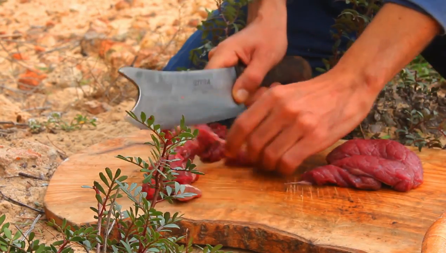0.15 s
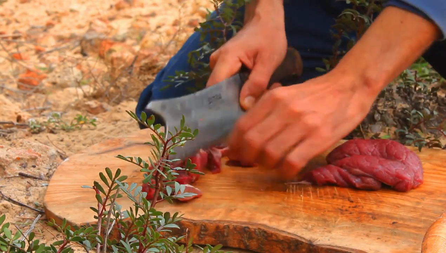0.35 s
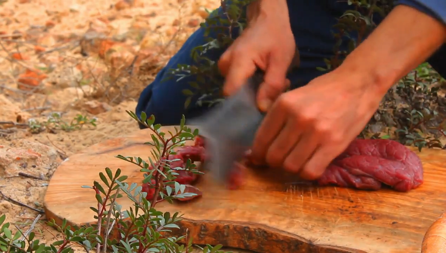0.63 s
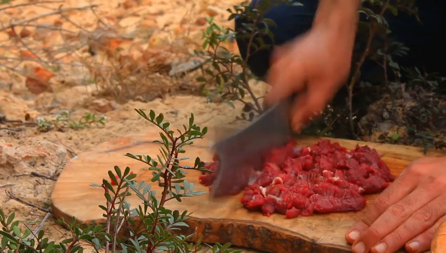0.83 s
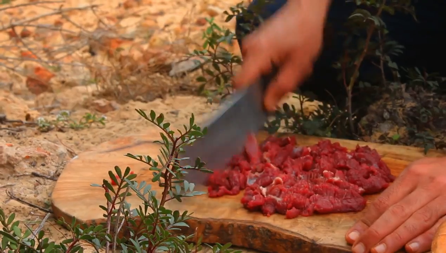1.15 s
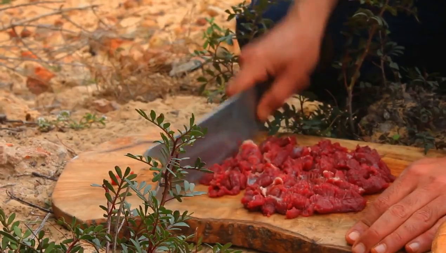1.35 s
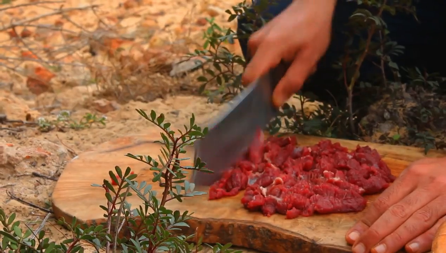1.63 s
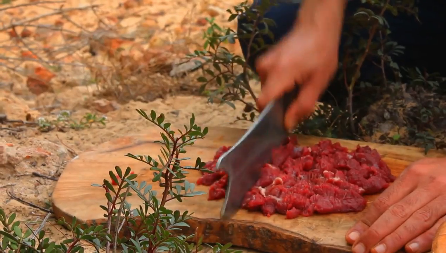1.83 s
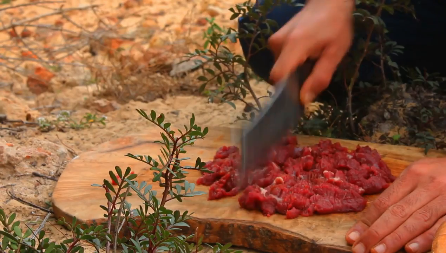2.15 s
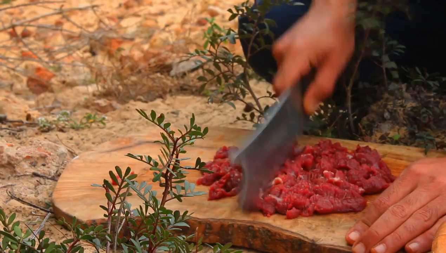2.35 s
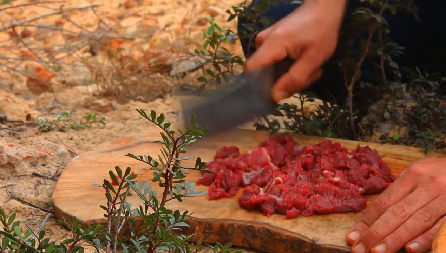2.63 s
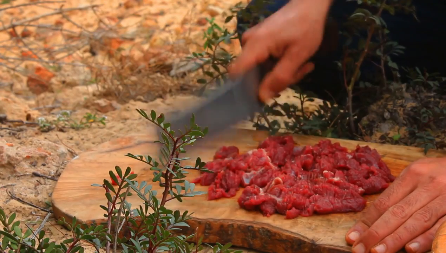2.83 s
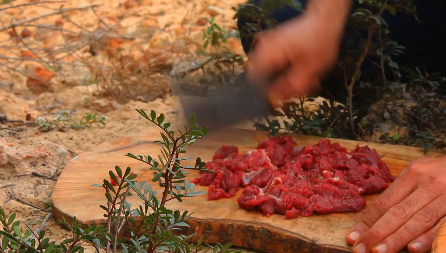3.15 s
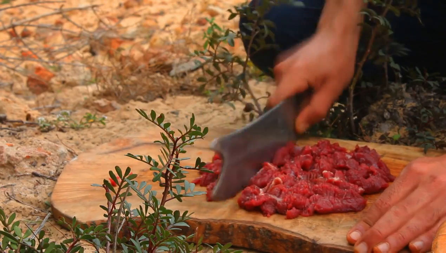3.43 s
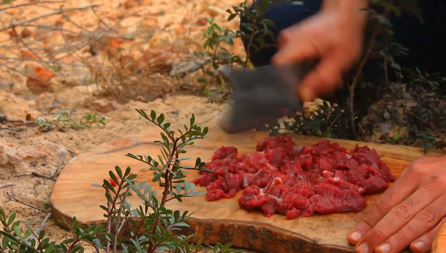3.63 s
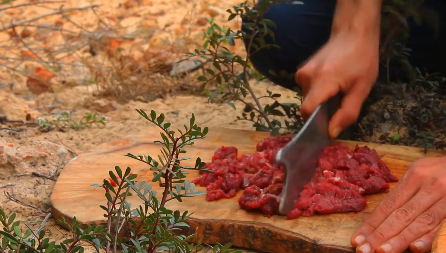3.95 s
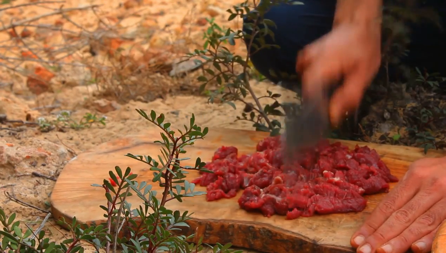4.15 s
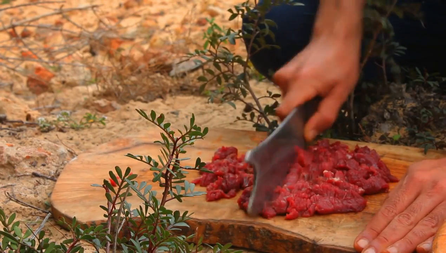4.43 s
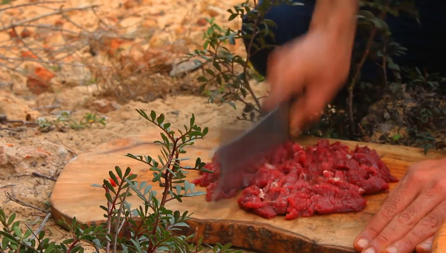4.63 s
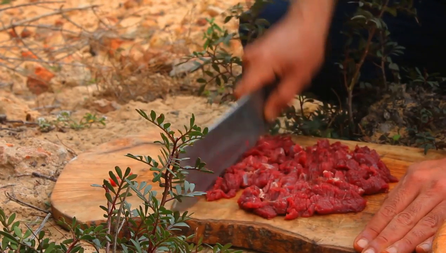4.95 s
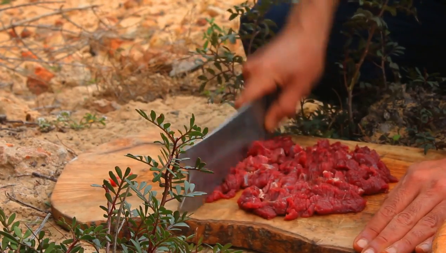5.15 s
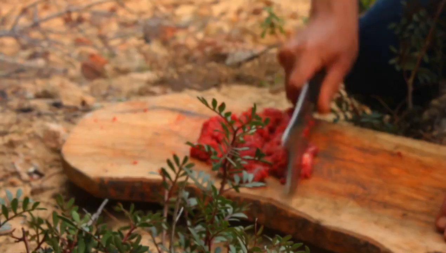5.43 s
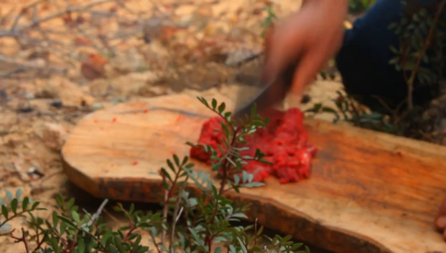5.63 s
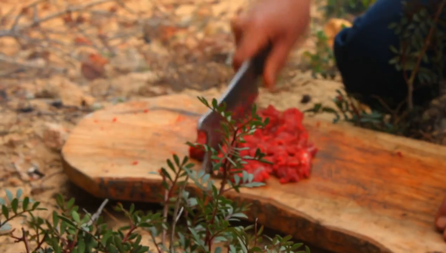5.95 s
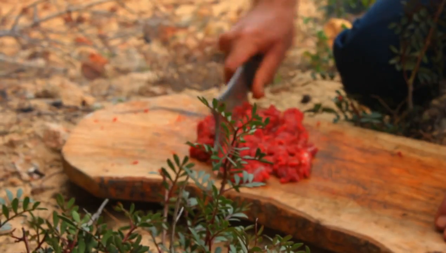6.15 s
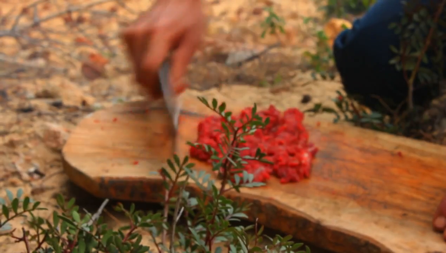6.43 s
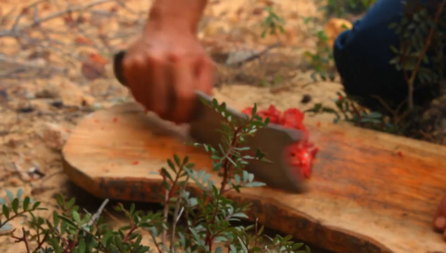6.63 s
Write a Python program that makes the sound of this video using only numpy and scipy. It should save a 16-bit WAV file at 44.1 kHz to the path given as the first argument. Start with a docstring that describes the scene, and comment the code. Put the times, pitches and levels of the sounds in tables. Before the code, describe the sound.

Close up outdoors, a blade first slices sinewy meat with faint gritty rasps and tiny snaps. From about one second a cleaver chops meat on a thick wooden slab, roughly four strokes a second, some sharp and loud with a dull steel clank, others soft and thuddy. Sticky wet crackles fill the gaps. The last strokes sound lower and boomier, then the blade briefly scrapes the wood. Faint wind lies behind.

```python
"""Mincing meat with a cleaver

A cleaver minces raw meat on a thick wooden slab lying on stony ground, heard from close by, in two shots.
Each stroke is a grainy squelch, then decaying slab and blade modes softened by the meat; loud ones duck
the gain and clip. Sinew rasps and sticky meat crackles as filtered grains and snaps, the slab bumps on
the earth, and lastly the blade scrapes the wood. Shaped noise is far wind, gliding tones are birds.
"""
import sys
import numpy as np
from scipy import signal
from scipy.fft import rfft, irfft
from scipy.io import wavfile

SR = 44100
rng = np.random.default_rng(int(sys.argv[2]) if len(sys.argv) > 2 else 0)


def dump(signal):
    """Clip the signal to [-1, 1] and save it as 16-bit WAV at the path in sys.argv[1]."""
    limited = np.clip(np.atleast_2d(signal).T, -1, 1)
    pcm = np.round(limited * 32767).astype(np.int16)
    wavfile.write(sys.argv[1], SR, pcm)


N = 298998
TIME = np.arange(N) / SR
RING = TIME[:8192]  # time axis of one blow, s
CUT_S = 5.45  # cut to a second shot, with the slab resting differently

# Cleaver strokes. Each row: time in seconds, force in dB, contact sharpness in Hz, pitch favoured by the
# struck spot in Hz, relative blade ring in dB, squelch in dB, meat clinging on the lift before it in dB.
CHOPS = [(.983, -11.5, 1290, 1340, -0.5, -20, -44.5), (1.1977, 2.5, 1260, 793, -13.5, -13, -46),
         (1.4168, -3, 3170, 1074, 11, -0.5, -47.5), (1.655, -0.5, 690, 706, 4.5, -20, -51.5),
         (1.9237, -12, 503, 156, 3.5, -31.5, -52), (2.155, -13.5, 454, 450, -23, -26.5, -43),
         (2.388, -4, 1430, 450, 8.5, -16.5, -43.5), (2.62, -11, 440, 390, 2, -26.5, -47.5),
         (2.8464, -1.5, 3120, 910, 9, -2.5, -50.5), (3.0734, 3, 2260, 890, -3, -9.5, -82),
         (3.0815, -7.5, 1340, 1110, 3, -40, -42), (3.3242, -5, 694, 590, 1.5, -21.5, -43.5),
         (3.572, -2.5, 2150, 490, -0.5, -15.5, -51.5), (3.827, -14, 625, 380, 5, -26, -53.5),
         (4.086, -14.5, 546, 427, -11, -29, -45), (4.3212, -11.5, 566, 406, -15, -28.5, -54.5),
         (4.561, -14.5, 496, 166, -21, -24, -46.5), (4.7854, -3, 1820, 627, 4, -10.5, -54.5),
         (5.0168, 1, 3230, 1360, 10, -2.5, -47), (5.252, 0, 3150, 583, 8, 4, -44.5),
         (5.5378, 3.5, 1460, 756, 2, -13, -67), (5.786, -12.5, 312, 187, 5.5, -31, -68),
         (6.025, -14.5, 270, 156, 9.5, -37.5, -66), (6.2778, -6.5, 525, 204, -23, -22.5, -74),
         (6.602, -6.5, 1450, 924, -1, -22.5, -86)]
# Spectrum of snapping meat. Each row: frequency in Hz, relative level in dB.
SNAP_COLOUR = [(500, -20), (2000, -11.5), (3300, -4.5), (5000, 3.5), (9500, 3), (13000, -4.5),
               (16000, -4.5)]


def undb(db):
    """Decibels to gain."""
    return 10 ** (np.asarray(db) / 20)


def curve(rows):
    """Gain along a table of (s, dB)."""
    return undb(np.interp(TIME, *np.transpose(rows)))


def add(out, s, sound):
    """Mix a sound in at a time in seconds."""
    i = int(s * SR)
    out[i:i + len(sound)] += sound[:N - i]


def response(colour, size=2048):
    """Minimum-phase impulse response of unit energy with a spectrum of (Hz, dB)."""
    hz, db = np.transpose(colour)
    bin_hz = np.arange(size // 2 + 1) * SR / size
    gain = undb(np.interp(np.log(bin_hz + 1), np.log(hz), db))
    # folding the cepstrum makes the response causal
    cepstrum = irfft(np.log(gain))
    cepstrum[1:size // 2] *= 2
    cepstrum[size // 2 + 1:] = 0
    h = irfft(np.exp(rfft(cepstrum)))
    return h / np.linalg.norm(h)


def convolve(x, h):
    """Pass a sound through an impulse response, keeping its length."""
    return signal.fftconvolve(x, h)[:len(x)]


def noise(colour, size):
    """Coloured noise of about unit rms."""
    h = response(colour)
    return signal.fftconvolve(rng.standard_normal(size + len(h) - 1), h, "valid")


def grains(size, spread_db):
    """Dense tiny clicks of uneven size, unit rms."""
    x = rng.standard_normal(size) * undb(spread_db * rng.standard_normal(size))
    return x / x.std()


def wander(per_s):
    """Random levels joined by straight lines."""
    return np.interp(TIME * per_s, np.arange(N), rng.standard_normal(N))


def fade(t60, t=RING):
    """Exponential decay by 60 dB in t60 seconds."""
    return np.exp(-np.log(1000) * t / t60)


def ring(modes):
    """Sum of decaying modes (Hz, t60 s, dB); neighbours swing in opposite directions."""
    out = 0
    for k, (hz, t60, db) in enumerate(modes):
        out = out + (-1) ** k * undb(db) * fade(t60) * np.sin(2 * np.pi * hz * RING)
    return out


def cushion(x, hz):
    """A soft contact pushes longer and so excites less treble."""
    return signal.sosfilt(signal.butter(2, min(hz, .4 * SR), fs=SR, output="sos"), x)


def reflections(size):
    """Many separate echoes of uneven strength: coloured grains."""
    # Each row: frequency in Hz, relative level in dB.
    echo_colour = [(100, -9), (600, 8), (1400, 5.5), (2400, 3), (4000, -5), (7000, -27), (15000, -35)]
    uneven_db = 5
    return convolve(grains(size, uneven_db), response(echo_colour))


def air(waver_db=1, waver_per_s=7):
    """Far wind and open country: wavering noise, with another colour in the second shot."""
    # Wind strength. Each row: time in seconds, level in dB.
    air_level = [(0, -45.5), (1.1, -43.5), (1.6, -46.5), (2.8, -43), (3.4, -47.5), (5.1, -41.5),
                 (6.78, -44.5)]
    # Wind spectra before and after the cut. Each row: frequency in Hz, relative level in dB.
    air_early = [(25, -70), (70, -12.5), (145, -5), (229, -2), (326, -8.5), (550, -10), (850, -7.5),
                 (1400, -15), (3000, -26), (8000, -29.5), (16000, -42.5)]
    air_late = [(25, -18), (70, -3.5), (190, 0.5), (450, -11.5), (750, -5), (1050, -9), (1400, -5.5),
                (2400, -21.5), (5000, -29.5), (9300, -34.5), (16000, -39)]
    hush = np.where(TIME < CUT_S, noise(air_early, N), noise(air_late, N))
    return hush * curve(air_level) * undb(waver_db * wander(waver_per_s))


def birds(waver=.035, waver_per_s=600):
    """Thin whistles from far away: gliding tones of unsteady pitch."""
    # Each row: start in seconds, length in seconds, start and end pitch in Hz, level in dB.
    chirps = [(0.405, 0.034, 4100, 2640, -46.5), (1.966, 0.11, 2240, 2160, -51.5)]
    out = np.zeros(N)
    for s, length_s, start_hz, end_hz, db in chirps:
        along = np.minimum(RING / length_s, 1)
        glide_hz = start_hz * (end_hz / start_hz) ** along
        hz = glide_hz * (1 + waver * wander(waver_per_s)[:len(RING)])
        add(out, s, undb(db) * np.sin(np.pi * along) * np.sin(2 * np.pi * np.cumsum(hz) / SR))
    return out


def surroundings(x, delay_s=0.014, near_db=-33, near_t60=0.03, far_db=-47, far_t60=0.93):
    """Stones and shrubs scatter a quick echo; the slope returns a faint long one."""
    t = TIME[:SR]
    tail = np.zeros(SR)
    for db, t60 in [(near_db, near_t60), (far_db, far_t60)]:
        decay = fade(t60, t)
        tail += undb(db) * decay / np.linalg.norm(decay)
    return convolve(x, np.r_[np.zeros(int(delay_s * SR)), tail * reflections(SR)])


def slicing(grain_db=5, edge_s=0.005, strand_s=0.0017, rasp_db=6.5, rasps_per_s=200):
    """The edge is drawn through sinew, which gives way in short rasps; tough strands part in bursts."""
    # Slow draws of the edge. Each row: start in seconds, length in seconds, level in dB.
    slices = [(0, 0.31, -53.5), (0.432, .19, -47.5), (5.833, 0.067, -53)]
    # Tough strands parting. Each row: time in seconds, level in dB.
    strands = [(0.127, -34.5), (0.229, -38), (0.523, -38), (.6, -27.5), (5.958, -37.5)]
    # Each row: frequency in Hz, relative level in dB.
    slice_colour = [(500, 12), (2000, -3), (6000, -0.5), (11000, -1.5), (16000, -13.5)]
    draw, parting = np.zeros(N), np.zeros(N)
    for s, length_s, db in slices:
        draw += undb(db) * np.clip(np.minimum(TIME - s, s + length_s - TIME) / edge_s, 0, 1)
    for s, db in strands:
        parting += undb(db) * np.exp(-np.minimum(np.abs(TIME - s) / strand_s, 20) ** 2)
    pull = draw * undb(rasp_db * wander(rasps_per_s)) + parting
    return convolve(pull * grains(N, grain_db), response(slice_colour))


def peeling(lift_s=0.21, attack_s=0.11, sag_db_per_s=15, release_s=0.11):
    """Pull on the clinging meat: each lift builds before the blow, slackens, and fades out after it."""
    pull = np.zeros(N)
    for s, *_, cling_db in CHOPS:
        lifted_s = np.maximum(TIME - s + lift_s, 0)
        gate = np.clip(np.minimum(lifted_s / attack_s, 1 - (TIME - s) / release_s), 0, 1)
        pull += gate * undb(cling_db - sag_db_per_s * lifted_s)
    return pull


def film(scatter_db=3):
    """One snapping film of meat: a short click, each of slightly different colour."""
    colour = [(hz, db + scatter_db * rng.standard_normal()) for hz, db in SNAP_COLOUR]
    return response(colour, size=512)


def crackle(snap_db=2):
    """Wet meat parts in snaps: a few loud ones amid smaller neighbours, spurts of ticks, a fine fizz."""
    # Loudest snaps. Each row: time in seconds, relative peak in dB.
    snaps = [(0.831, -18), (0.9667, -4), (1.0715, -11), (1.1159, -10), (1.1643, -12), (1.6916, -8),
             (1.7499, -14), (1.7759, -16), (1.8422, -12), (1.8826, -12), (2.0537, -11), (2.2243, -11),
             (2.2468, -4), (2.2787, -14), (2.3156, -9), (2.359, -14), (2.7551, -9), (2.814, -10),
             (3.1822, -18), (3.2675, -16), (3.9549, -15), (4.0532, -17), (5.1751, -21), (5.3976, -18)]
    ticks_per_s, tick_db, spread_db, most_db = 95, 15.5, 9, 20
    fizz_db, fizz_grain_db, spurt_db, spurts_per_s = -9, 5.5, 3, 55
    neighbours, neighbour_s, neighbour_db = 2, .014, (-18, -6)
    out, pull = np.zeros(N), peeling()
    for s, db in snaps:
        cluster = [(s, db)]
        for _ in range(neighbours):
            cluster.append((s + neighbour_s * rng.standard_normal(), db + rng.uniform(*neighbour_db)))
        for at_s, peak_db in cluster:
            snap = film()
            add(out, at_s, undb(snap_db + peak_db) * snap / np.abs(snap).max())
    # ticks come in spurts as pieces peel apart
    spurt = undb(spurt_db * wander(spurts_per_s))
    for i in np.flatnonzero(rng.random(N) < spurt ** 2 * ticks_per_s / SR):
        size = undb(tick_db + min(spread_db * rng.exponential(), most_db))
        add(out, TIME[i], rng.choice([-1, 1]) * size * pull[i] * film())
    fizz = undb(fizz_db) * spurt * pull * grains(N, fizz_grain_db)
    return out + convolve(fizz, response(SNAP_COLOUR))


def scrape(grain_db=5, judder_db=4, judder_per_s=250, sing_db=-1):
    """The edge sticks and slips over the wood grain and sets the steel singing."""
    # Drag of the blade. Each row: time in seconds, level in dB.
    drag = [(6.62, -60), (6.67, -43.5), (6.688, -48.5), (6.72, -39.5), (6.752, -47), (6.762, -58)]
    # Each row: frequency in Hz, relative level in dB.
    scrape_colour = [(500, -2), (1500, 5.5), (2200, -6), (3400, -4), (4800, -6), (7500, -8), (10500, -14),
                     (16000, -29)]
    # Singing blade. Each row: mode frequency in Hz, t60 in seconds, relative level in dB.
    scrape_modes = [(3200, 0.0029, 16), (4740, 0.014, 5), (6260, .025, -5), (9170, 0.043, -7.5)]
    judder = undb(judder_db * wander(judder_per_s))
    slips = grains(N, grain_db) * curve(drag) * judder * (TIME > drag[0][0])
    steel = ring(scrape_modes)
    singing = undb(sing_db) * convolve(slips, steel / np.linalg.norm(steel))
    return convolve(slips, response(scrape_colour)) + singing


def rocking(push_s=0.0058):
    """Dull modal bumps with a gradual onset: the slab rocks back on the ground, and the first bump is a light
    tap of the cleaver."""
    # Each row: time in seconds, peak in dB.
    rocks = [(0.824, -16.5), (1.002, -28), (1.0449, -15), (1.22, -16), (1.256, -22), (3.642, -20),
             (4.812, -15), (5.595, -25)]
    # Each row: mode frequency in Hz, t60 in seconds, relative level in dB.
    rock_modes = [(396, 0.014, 12.5), (453, 0.019, 6.5), (676, 0.014, 1.5), (940, 0.013, -1)]
    out = np.zeros(N)
    bump = ring(rock_modes) * (1 - np.exp(-RING / push_s))
    for s, db in rocks:
        add(out, s, undb(db) * bump / np.abs(bump).max())
    return out


def thuds(first_db=-38, second_db=-35, build_s=0.0061, sink=0.4, pitch_spread=0.066):
    """Soft blows rock the heavy slab on the earth more than hard ones, most in the second shot."""
    # Slab on earth. Each row: nominal mode frequency in Hz, t60 in seconds, relative level in dB.
    ground_modes = [(106.3, 0.23, -0.5), (163.4, 0.11, 8.5), (255.3, 0.098, 6.5)]
    out = np.zeros(N)
    for s, force_db, *_ in CHOPS:
        pitch = 1 + pitch_spread * rng.standard_normal()
        bounce = ring([(hz * pitch, t60, db) for hz, t60, db in ground_modes])
        bounce = bounce * (1 - np.exp(-RING / build_s))
        shot_db = first_db if s < CUT_S else second_db
        add(out, s, undb(shot_db - sink * force_db) * bounce)
    return out


def squelches(lead_cycles=0.64, rise_cycles=0.8, fall_cycles=2.3, ooze_db=-19, ooze_t60=0.044, grain_db=4):
    """Fibres tear in a grainy burst around the landing, longer under a soft contact; juice oozes after."""
    # Each row: frequency in Hz, relative level in dB.
    squelch_colour = [(200, -37), (1200, -2.5), (2500, -7), (5000, -7.5), (9000, -18.5), (16000, -26.5)]
    out = np.zeros(N)
    early_s = len(RING) // 10 / SR  # room for the rise
    t = RING - early_s
    for s, _, contact_hz, *_, db, _ in CHOPS:
        rise = np.exp(np.minimum(t, 0) * contact_hz / rise_cycles)
        tear = np.exp(-np.maximum(t, 0) * contact_hz / fall_cycles)
        ooze = undb(ooze_db) * fade(ooze_t60, np.abs(t))
        burst = convolve(rise * (tear + ooze) * grains(len(t), grain_db), response(squelch_colour))
        add(out, s - lead_cycles / contact_hz - early_s, undb(db) * burst)
    return out


def struck(modes, spot_hz, spot_db=8, spot_octaves=0.47, detune=.02):
    """Ring of one blow: the struck spot favours some modes, and clinging meat detunes each a little."""
    hz, t60, db = np.transpose(modes)
    favour_db = spot_db * np.exp(-(np.log2(hz / spot_hz) / spot_octaves) ** 2)
    return ring(zip(hz * (1 + detune * rng.standard_normal(len(hz))), t60, db + favour_db))


def chops(crack_db=-11, crack_t60=0.018, press_db=-6, press_cycles=1.324, scatter_db=-34, scatter_t60=0.28):
    """The edge presses the meat down and lands: slab and blade ring, with a short crack of wood fibres."""
    # Slab. Each row: nominal mode frequency in Hz, t60 in seconds, relative level in dB in the first
    # shot, the same in the second.
    slab_modes = [(140, 0.023, -27.5, -50), (159.6, 0.031, -7, -13.5), (224.5, 0.022, -4.5, -4.5),
                  (271, 0.038, -11, -11.5), (365, 0.037, -5.5, -11), (403, 0.049, -3.5, -48),
                  (477, 0.04, -10.5, -44), (553.6, 0.025, -8, 3), (757, 0.012, -4.5, 4),
                  (855, 0.022, 1, 1.5), (1040, 0.02, -1, -5.5), (1518, 0.016, -28.5, -1.5),
                  (1552, 0.063, -16, -9), (2052, 0.013, -1.5, 2)]
    # Blade damped by meat and hand.
    # Each row: nominal mode frequency in Hz, t60 in seconds, relative level in dB.
    blade_modes = [(672.8, 0.043, -8), (1238, 0.021, -1), (1765, 0.016, -1.5), (2640, 0.026, -14),
                   (3193, 0.012, -3.5), (4175, 0.007, 1.5), (4970, 0.017, -9.5), (7550, .008, -13.5)]
    # Each row: frequency in Hz, relative level in dB.
    crack_colour = [(40, -11), (300, -21), (1000, -36), (2000, -14.5), (4000, 31.5), (8000, -44.5),
                    (16000, -39)]
    out = np.zeros(N)
    for s, force_db, contact_hz, spot_hz, blade_db, *_ in CHOPS:
        slab = [(hz, t60, first if s < CUT_S else second) for hz, t60, first, second in slab_modes]
        crack = undb(crack_db) * fade(crack_t60) * noise(crack_colour, len(RING))
        # the upright blade throws its clang sideways; the stones around return it smeared
        scatter = undb(scatter_db) * fade(scatter_t60) * reflections(len(RING))
        blade = undb(blade_db) * (struck(blade_modes, spot_hz) + scatter)
        knock = crack + struck(slab, spot_hz) + blade
        add(out, s, undb(force_db) * cushion(knock, contact_hz))
        # the slab dips and springs back once, more slowly under a soft contact
        press_s = press_cycles / contact_hz
        dip = -np.sin(2 * np.pi * np.minimum(RING / press_s, 1))
        add(out, s - press_s / 2, undb(force_db + press_db) * dip)
    return out


def gain_control(x, threshold_db=-3, slope=0.3, attack_s=0.027, recover_db_per_s=11):
    """A hard stroke turns the gain down, too late to tame itself; the gain then creeps back."""
    excess_db = slope * np.maximum(20 * np.log10(np.abs(x) + 1e-9) - threshold_db, 0)
    recovery_db = recover_db_per_s * TIME
    held_db = np.maximum.accumulate(excess_db + recovery_db, axis=-1) - recovery_db
    pole = np.exp(-1 / (attack_s * SR))
    cut_db = signal.lfilter([1 - pole], [1, -pole], held_db)
    return x * undb(-cut_db)


def scene():
    """Everything on the slab, its echo and the open air."""
    close = chops() + thuds() + squelches() + rocking() + slicing() + crackle() + scrape()
    return (air() + birds() + surroundings(close) + close)[None]


def record(dry, top_hz=16000):
    """The gain ducks after hard strokes, the input clips flat on peaks, and the top is cut."""
    clipped = np.clip(gain_control(dry), -1, 1)
    return signal.sosfilt(signal.ellip(10, .05, 90, top_hz, fs=SR, output="sos"), clipped)


dry = scene()
out = record(dry)
dump(out)
```